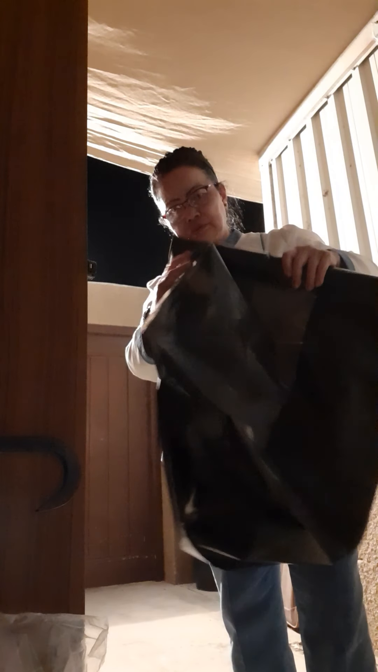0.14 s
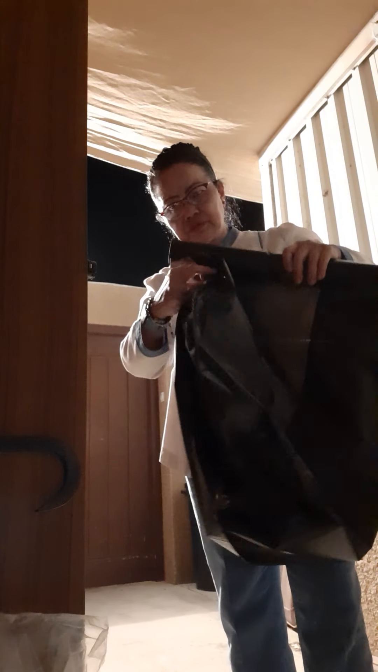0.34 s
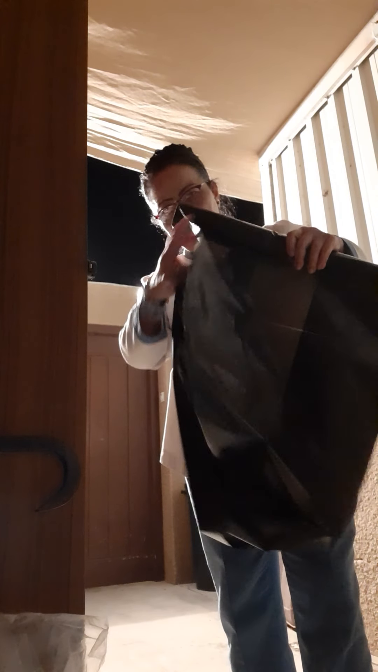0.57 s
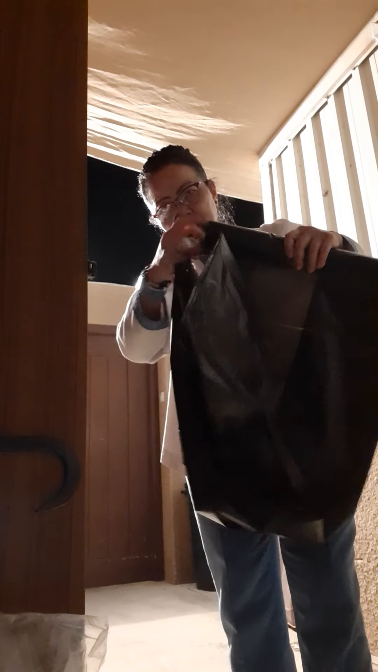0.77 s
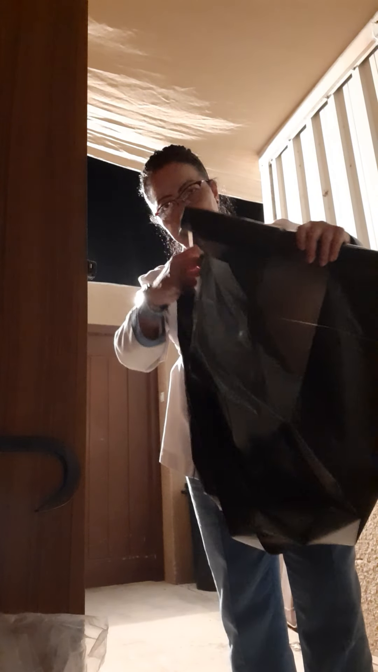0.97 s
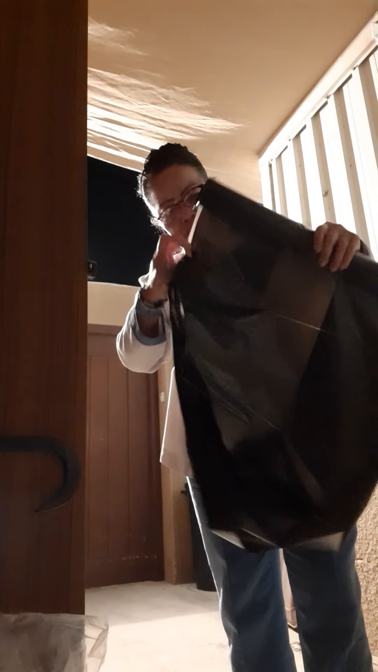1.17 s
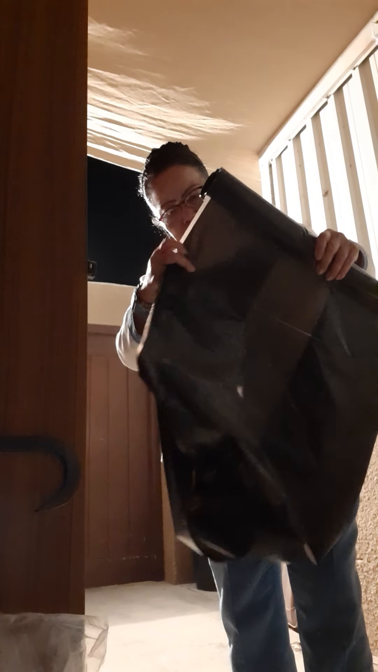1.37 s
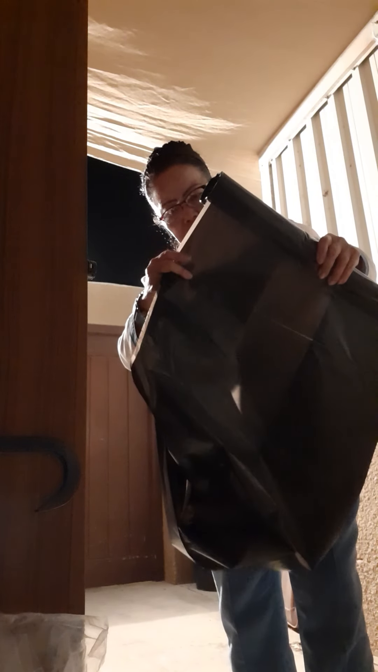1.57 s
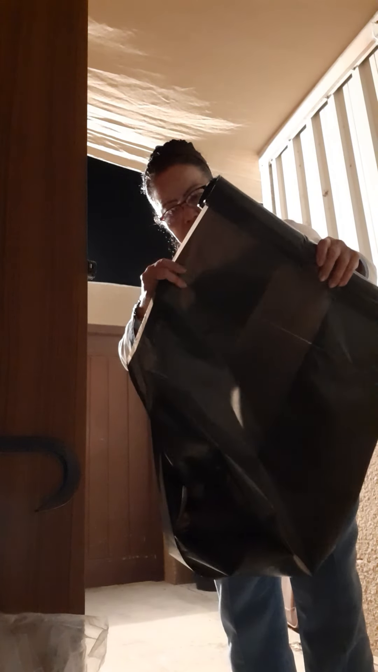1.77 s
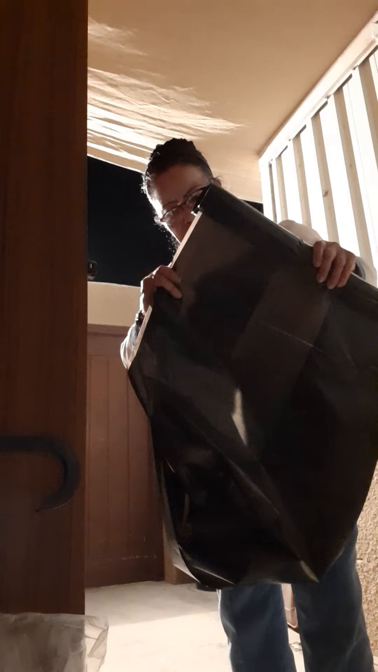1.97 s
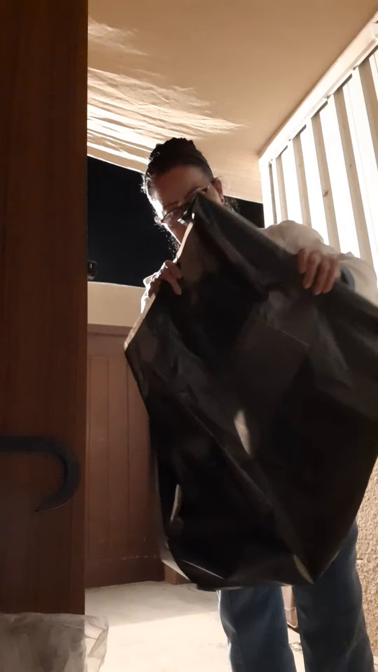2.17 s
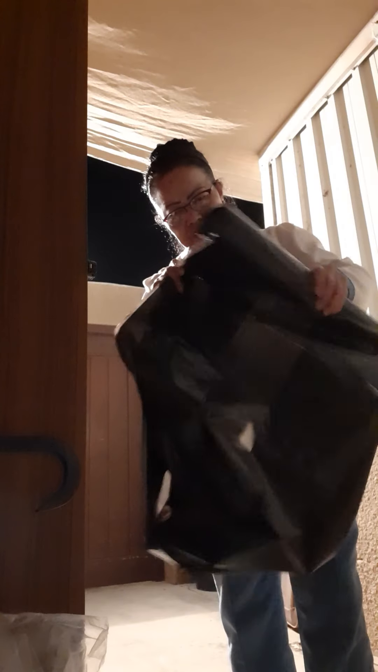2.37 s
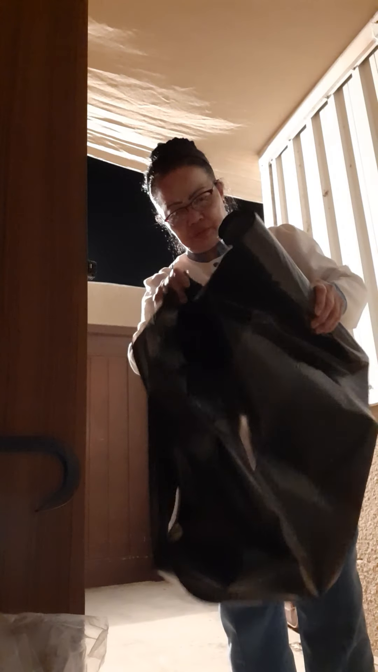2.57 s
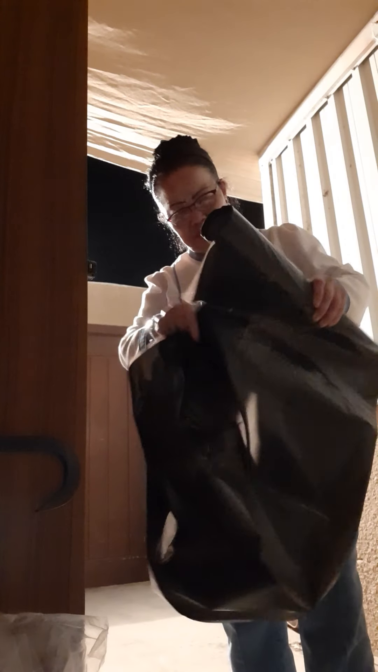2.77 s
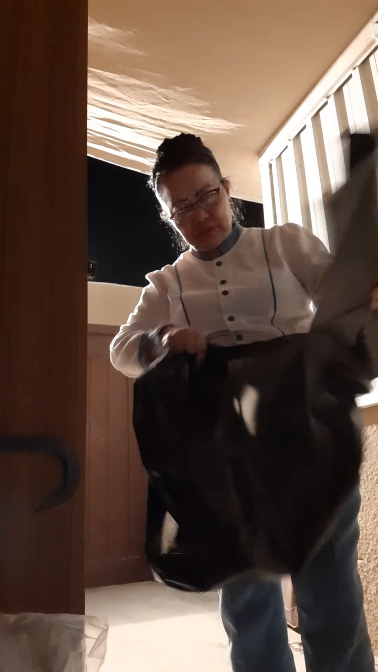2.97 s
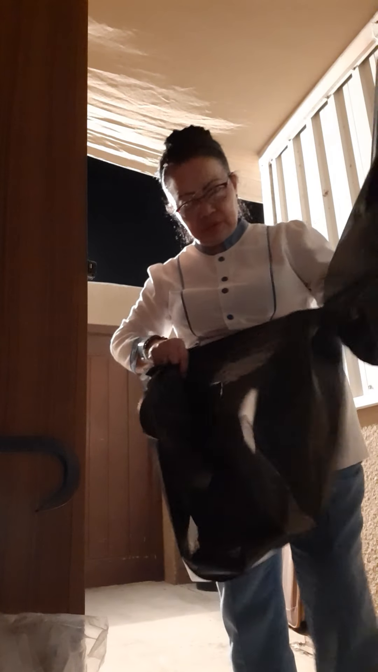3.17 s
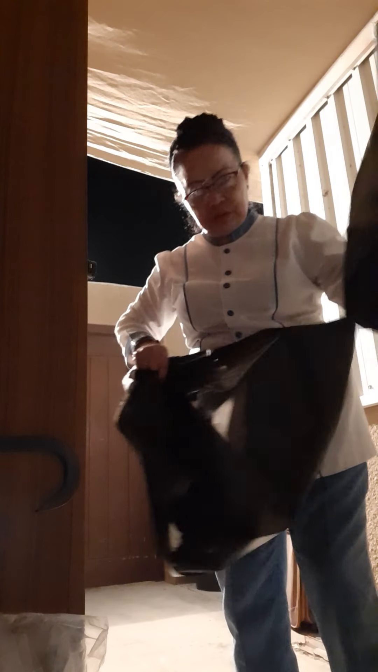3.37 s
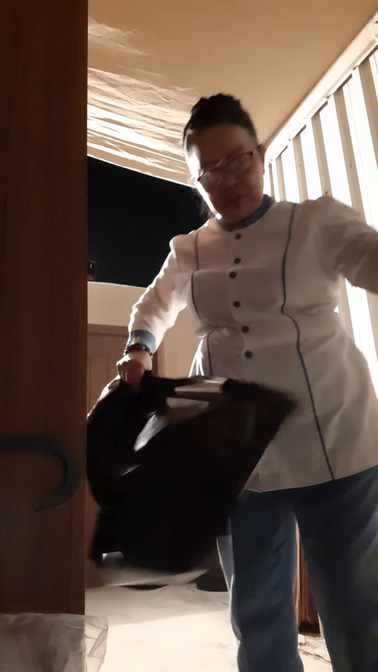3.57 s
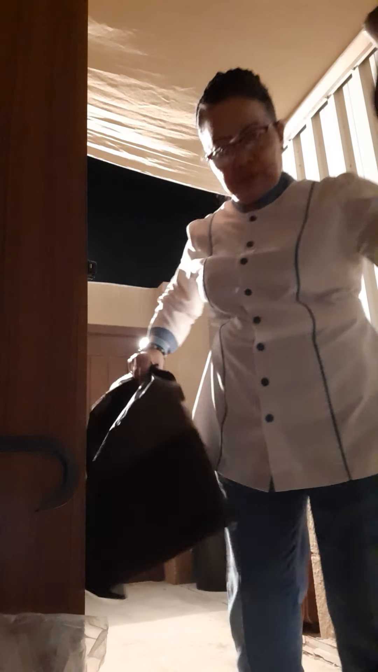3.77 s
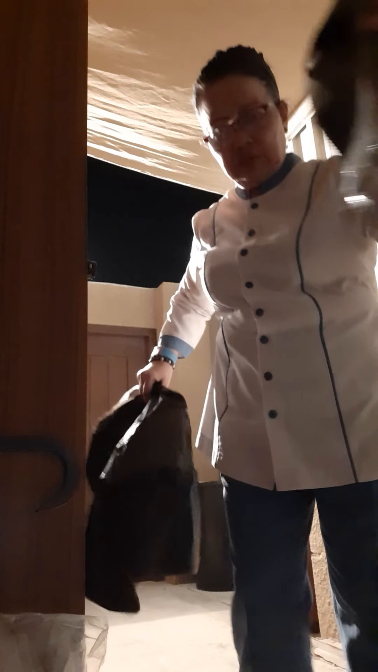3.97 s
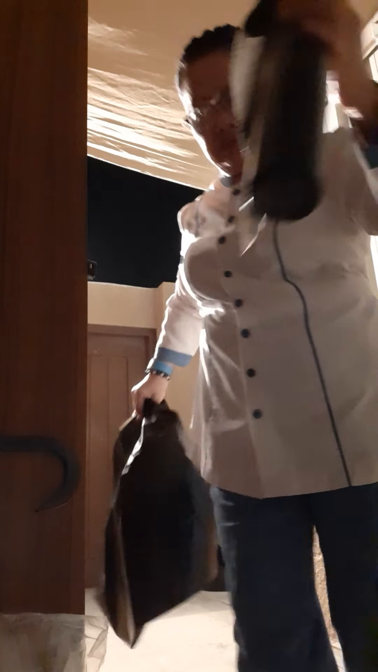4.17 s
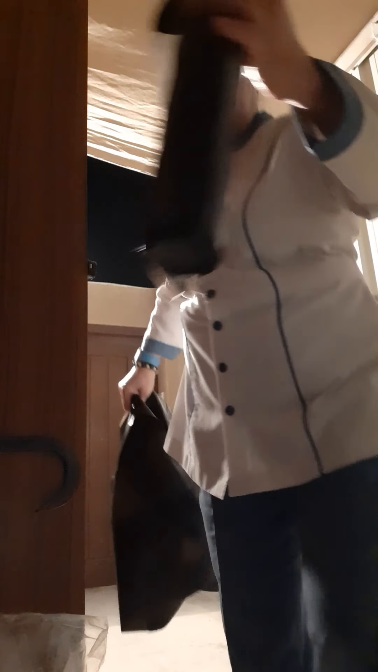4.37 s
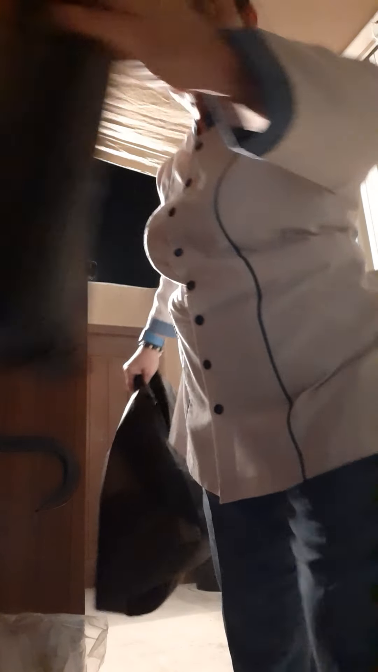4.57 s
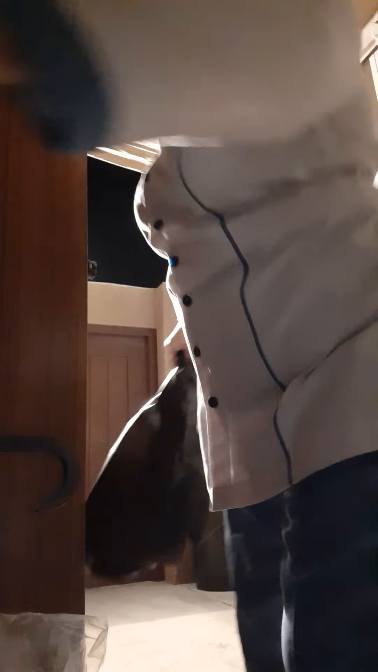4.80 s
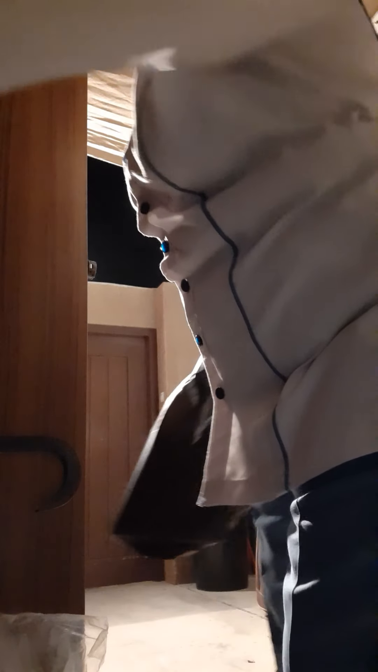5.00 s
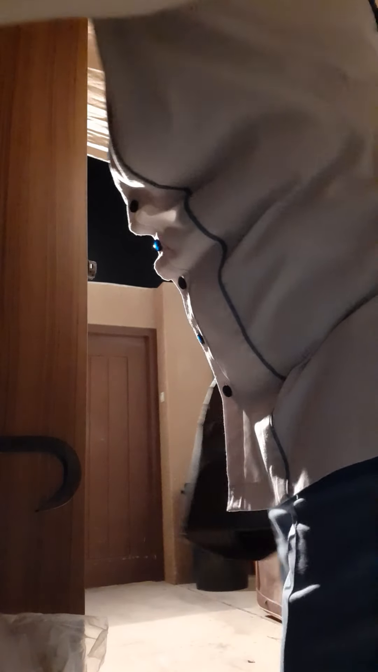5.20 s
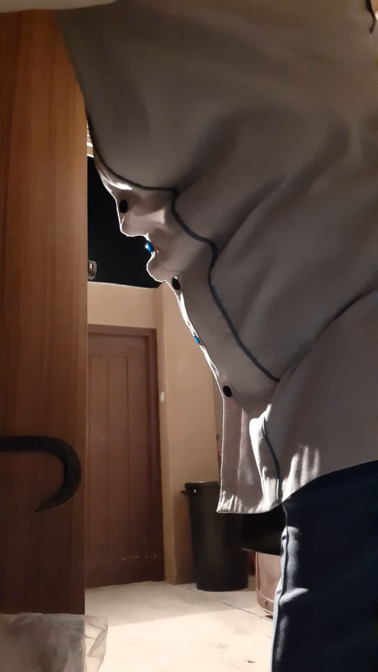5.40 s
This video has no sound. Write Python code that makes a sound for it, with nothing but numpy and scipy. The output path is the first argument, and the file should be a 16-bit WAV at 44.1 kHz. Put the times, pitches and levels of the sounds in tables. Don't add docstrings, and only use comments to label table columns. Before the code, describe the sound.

Quiet plastic rustling gives way to sharp crackling jerks, a long tearing rip, then small rustles and a loud crinkly drag.

```python
import sys
import numpy as np
from scipy import signal
from scipy.fft import rfft, irfft
from scipy.io import wavfile

SR = 44100
rng = np.random.default_rng(int(sys.argv[2]) if len(sys.argv) > 2 else 0)


def nominal_scale(level):
    x = np.asarray(level, float) / 20
    return 10 ** x


def pcm_store(signal):
    levels = np.round(np.clip(np.atleast_2d(signal), -1, 1) * 32767)
    wavfile.write(sys.argv[1], SR, levels.astype(np.int16).T)


N = 239977
SLOW = 40


def rms_one(x):
    return x / np.sqrt(np.mean(x ** 2) + 1e-20)


def in_time(rows):
    s, *columns = np.transpose(rows)
    return [np.interp(np.arange(N) / SR, s, column) for column in columns]


def at_hz(points, hz):
    table_hz, values = np.transpose(points)
    return np.interp(np.log(hz), np.log(table_hz), values)


def band(x, low_hz, high_hz, order=2):
    return signal.sosfilt(signal.butter(order, [low_hz, high_hz], "band", fs=SR, output="sos"), x)


def high_pass(x, hz):
    return signal.lfilter(*signal.butter(1, hz, "high", fs=SR), x)


def peak(x, hz, width_hz, db):
    return x + (nominal_scale(db) - 1) * signal.lfilter(*signal.iirpeak(hz, hz / width_hz, fs=SR), x)


def drift(per_s):
    r = np.exp(-2 * np.pi * SLOW * per_s / SR)
    noise = rng.standard_normal(N // SLOW + 2002)
    slow = signal.lfilter([1], [1, -2 * r, r * r], noise)[2000:]
    return np.interp(np.arange(N) / SLOW, np.arange(len(slow)), rms_one(slow))


def sides(pan_db):
    return nominal_scale(np.array([pan_db / 2, -pan_db / 2]))


# pitch in Hz, level in dB per Hz.
RUMBLE_COLOUR = [(25, 4), (60, 3.5), (100, -2.5), (220, -13), (480, -22), (800, -21.5), (1150, -20),
                 (1700, -31.5), (2500, -36), (6000, -44.5), (16000, -53)]
# time in seconds, level in dB.
RUMBLE_LEVEL = [(0.0, -48), (0.8, -47.5), (2.3, -48.5), (2.8, -45.5), (3.36, -43), (3.68, -50), (4.15, -47),
                (4.76, -49), (5.44, -45.5)]
# pitch in Hz, likeness (1 same, -1 opposite).
RUMBLE_LIKENESS = [(60, 1), (180, 0.9), (550, 0.57), (1650, -0.24), (4970, -1.38), (15000, -1.8)]


def rumble(patchy_db=2.5):
    out = 0
    edges_hz = 28 * 2 ** np.arange(0, 9.4, .5)
    white = rng.standard_normal((2, 2, N + 8000))
    for k, (low, high) in enumerate(zip(edges_hz, edges_hz[1:])):
        mid, side = band(white[k % 2], low, high)[:, 8000:]
        hz = np.sqrt(low * high)
        alike = np.clip(at_hz(RUMBLE_LIKENESS, hz), -1, 1)
        gain = nominal_scale(at_hz(RUMBLE_COLOUR, hz) + patchy_db * drift(5.6))
        out = out + gain * (np.sqrt(1 + alike) * mid + np.sqrt(1 - alike) * side * [[1], [-1]])
    return rms_one(out) * nominal_scale(in_time(RUMBLE_LEVEL)[0] + 3.0)


def porch(x):
    t60_s, first_echo_s = .2, .004
    t = np.arange(int(.3 * SR)) / SR
    noise = rng.standard_normal((2, len(t))) * nominal_scale(-60 * t / t60_s) * (t > first_echo_s)
    mid, side = band(noise, 290, 8000, order=1)
    side = high_pass(side, 450)
    tail = np.array([mid + side, mid - side])
    tail = tail / np.sqrt((tail ** 2).sum(axis=1, keepdims=True))
    return signal.oaconvolve(x, tail, axes=1)[:, :N]


# start in seconds, peak level in dB, pitch in Hz, time to fall 60 dB in seconds, left-right in dB.
KNOCKS = [
    (2.374, -21, 446, 0.11, -2),
    (2.417, -30.5, 322, 0.1, 3),
    (2.812, -27.5, 380, 0.11, 4),
    (2.826, -21, 308, 0.057, -3),
    (2.854, -22.5, 425, 0.17, 2),
    (2.94, -34, 566, 0.29, -12),
    (4.68, -20, 115, 0.015, -3),
    (4.685, -33.5, 350, 0.016, -8),
    (5.393, -35, 116, 0.028, 28),
    (5.398, -29, 527, 0.0052, 22),
]


def knocks():
    out = np.zeros((2, N + 4000))
    t = np.arange(4000) / SR
    for s, peak_db, hz, t60_s, pan_db in KNOCKS:
        swing = np.sin(2 * np.pi * hz * t) * nominal_scale(peak_db - 60 * t / t60_s)
        start = int(s * SR)
        out[:, start:start + 4000] += swing * sides(pan_db)[:, None]
    return out[:, :N]


def snaps(count, t60_s, tail_db, apart_hz):
    t = np.arange(1400) / SR
    decay = nominal_scale(-60 * t / t60_s) + nominal_scale(tail_db - 60 * t / (6 * t60_s))
    mid, side = rng.standard_normal((count, 2, 1400)).transpose(1, 0, 2) * decay
    side = high_pass(side, apart_hz)
    return np.stack([mid + side, mid - side], axis=1)


ZONE_CENTRES_HZ = [330, 1200, 4500, 11500]


def zones(x):
    size = x.shape[-1]
    place = np.interp(np.log(np.fft.rfftfreq(size, 1 / SR) + 1), np.log(ZONE_CENTRES_HZ), np.arange(4))
    spectrum = rfft(x)
    weights = [np.cos(np.pi / 2 * np.clip(place - k, -1, 1)) ** 2 for k in range(4)]
    return [irfft(spectrum * weight, size) for weight in weights]


# start in
# seconds, peak level in dB, body in dB against the peak, sizzle in dB against the peak before a fixed 15 dB
CREASES = [(.1471, -45, -21, -4), (.2892, -43, -19, -21), (.3067, -23, -12, -39),
           (0.4516, -39, -1, -11), (0.4906, -44, -14, -10), (.58, -35.5, -17, -16),
           (.7644, -34, -11, -14), (0.806, -36.5, -2, -20), (0.937, -33, -8, -20),
           (.9557, -37, -3, -18), (0.997, -39, 1, -24), (1.0294, -37, -4, -15),
           (1.1072, -26, -23, -9), (1.13, -24, -29, -24), (1.137, -33.5, -0.5, -15),
           (1.1974, -42.5, -20, -4.5), (1.2397, -33.5, -5, -28), (1.258, -45, -3, -24),
           (1.285, -29.5, -1.5, -19), (1.3803, -39, -2, -9), (1.7, -49, -20, -12),
           (1.7366, -37, -9, -15), (1.7922, -46, -6, 5.5), (2.0168, -43, -5, -6.5),
           (2.061, -34.5, -30, -26), (2.141, -36, -3.5, -20), (2.169, -33, -7.5, -34),
           (2.2106, -33, -16, -15), (2.2235, -31, -23, -12), (2.256, -31.5, -22, -9),
           (2.2741, -22.5, -24, -26), (2.3057, -40, -9, 1.5), (2.328, -45.5, 12, -18),
                (2.3743, -12, -2.5, -8.5), (2.438, -31, 2, -3), (2.4784, -24, -26, -9),
                (2.555, -36, 2, -3.5), (2.579, -32, -32, -20), (2.611, -26, -7, -26), (2.684, -35, -4, -20),
                (2.7182, -25.5, -9, -33), (2.756, -42, -21, 4), (2.8018, -16.5, 0, -8.5),
                (2.8135, -18.5, 2.5, -14), (2.9051, -21.5, 6, -18), (2.9134, -13.5, 4, -20),
                (2.9207, -9, -7, -18), (3.0379, -15.5, -6, -14), (3.0737, -16, -3.5, -42),
           (3.478, -33, -19, -26), (3.498, -39, -23, -24), (3.5498, -45, -18, -5),
                 (3.5873, -36, -26, -33), (3.6164, -36, -19, -22), (3.639, -27, -11.5, -15),
                 (3.66, -28, -26, -15), (3.6763, -22, -2, -17), (3.7219, -25, -6.5, -22),
                 (3.977, -39.5, -15, -12), (4, -37, -7, -26), (4.054, -48, -8, -11), (4.127, -30, -6, -4),
                 (4.303, -42, -25, -17), (4.244, -58.5, 11, -14), (4.353, -50, -16, -7),
                 (4.376, -38.5, -10, -11), (4.4135, -51, 15, -16), (4.5683, -44, -24, -21),
                 (4.6034, -41, -16, -7), (4.6965, -39.5, -23, -7), (4.7204, -41, -28, -10),
                 (4.771, -35.5, -23, -29), (4.8681, -45, -25, 3), (4.9018, -37.5, -20, -14),
                 (5.151, -17, -22, -31), (5.2273, -19, -19, -14), (5.064, -26, -15, -13),
                 (5.3339, -23, -18, -15)]


def creases():
    s, peak_db, body_db, sizzle_db = np.transpose(CREASES)
    pan_db = 4 * rng.standard_normal(len(s))
    shapes = snaps(count=len(s), t60_s=.004, tail_db=-7, apart_hz=3000)
    lead = 100
    size = 1400 + lead
    _, body, middle, sizzle = zones(np.pad(shapes, ((0, 0), (0, 0), (lead, 0))))
    facet_hz = 4600 * 2 ** (.22 * rng.standard_normal((len(s), 1, 1)))
    octaves = np.log2((np.fft.rfftfreq(size, 1 / SR) + 1) / facet_hz)
    middle = irfft(rfft(middle) * (0.69 + np.exp(-(octaves / 0.61) ** 2)), size)
    cracks = 0
    for zone, db in [(body, body_db), (middle, -1.5), (sizzle, sizzle_db + 15.0)]:
        level = nominal_scale(peak_db + db)[:, None, None]
        cracks = cracks + zone / np.abs(zone).max(axis=(1, 2), keepdims=True) * level
    out = np.zeros((2, N + size))
    for start, crack, pan in zip((s * SR).astype(int), cracks, pan_db):
        out[:, start:start + size] += crack * sides(pan)[:, None]
    return out[:, lead:N + lead]


def tearing():
    from_s, to_s, bridges_per_s, depth_db = 3.05, 3.1, 100, 4.5
    t = np.arange(N) / SR
    turns = bridges_per_s * t + 0.35 * drift(50)
    uneven = np.clip(1 + 0.33 * drift(36), 0, 2)
    return depth_db * (.5 - turns % 1) * (t > from_s) * (t < to_s) * uneven


# start in seconds, end in seconds, extra path in seconds, strength from 0 to 1.
MIRROR = [
    (4.04, 4.2, .00037, .3),
    (4.95, 5.44, .00023, .2),
]


def mirrored(x):
    out = x.copy()
    echo = (x + np.roll(x, 1, axis=1)) / 2
    for start_s, stop_s, lag_s, strength in MIRROR:
        a, b, lag = int(start_s * SR), min(int(stop_s * SR), N), int(lag_s * SR)
        both = x[:, a:b] + strength * echo[:, a - lag:b - lag]
        out[:, a:b] = both / np.hypot(1, strength)
    return out


def movement(rows):
    t = np.arange(0, N + SLOW, SLOW)[:, None] / SR
    at, rise, hold, fall, level_db = np.transpose(rows)
    away = np.maximum(np.maximum((at - t) / rise, (t - at - hold) / fall), 0)
    swing_db = 20
    return (nominal_scale(level_db - swing_db * away * (1 + away) / 2) ** 2).sum(axis=1) + 1e-30


# full strength at seconds, rise in seconds, hold in seconds, fall in seconds, crackle level in dB.
FIDGETS = [(.03, 0.13, 0.084, 0.14, -61.5), (.24, 0.32, 0.022, 0.11, -57.5),
           (.32, 0.066, 0.03, 0.051, -45.5), (.47, 0.11, 0.12, 0.03, -56.5), (.77, 0.28, 0.014, 0.081, -54),
           (.94, 0.15, 0.11, .12, -54.5), (1.115, 0.022, 0.03, 0.02, -53), (1.23, 0.086, 0.015, 0.14, -53),
           (1.38, .12, 0, 0.087, -51.5), (1.47, 0.14, 0.065, 0.12, -62.5), (1.71, 0.13, 0.1, 0.11, -60),
           (2.765, .03, 0.029, .03, -43.5), (3.79, .04, 0.03, 0.092, -61), (3.87, 0.11, .07, 0.11, -65),
           (4.2, .1, .07, 0.11, -67.5), (4.47, .1, 0.08, 0.065, -70), (3.99, .04, 0.02, 0.065, -54.5),
           (4.32, 0.12, 0.08, 0.11, -61.5), (4.615, 0.046, .03, .07, -54.5),
           (4.7, 0.015, 0.023, .04, -59.5), (4.78, 0.054, .04, 0.086, -55), (4.87, 0.055, 0.087, 0.11, -55)]
GROPES = [
    (2.018, 0.08, .06, 0.18, -57.5),
    (2.17, .12, 0.08, .1, -53),
    (2.332, .05, 0.032, 0.055, -41),
    (2.5, .05, 0.08, 0.069, -49),
    (2.65, 0.052, 0.031, .04, -56),
    (2.715, 0.05, 0.014, 0.05, -47),
    (3.49, .05, .01, 0.12, -57.5),
    (3.63, .07, 0.045, 0.061, -52),
    (3.689, .04, 0.044, 0.065, -43.5),
]
JERKS = [
    (2.379, .02, 0.002, 0.1, -27),
    (2.821, 0.029, 0.032, 0.14, -31),
]
STRAINS = [(2.88, 0.073, 0.045, .2, -27)]
RIPS = [
    (3.041, 0.036, 0.01, 0.19, -31.5),
    (3.141, 0.076, .3, 0.026, -34.5),
]
SLIDES = [
    (3.724, 0.0089, 0.0087, .065, -36),
    (4.055, .005, 0.035, .06, -38.5),
]
DRAGS = [
    (5.119, 0.1, 0.076, .2, -35),
    (5.3, .15, 0.022, 0.06, -42),
]
# sheet boom, body and sizzle in dB against the crackle,
# left-right in dB, share of smooth sliding from 0 to 1.
FIDGET_TONE = (-8.5, -4, -6, -0.5, 0.6)
GROPE_TONE = (-13.5, -5, -11, -0.5, 0.4)
JERK_TONE = (-2, -2, -5.5, -0.2, .3)
STRAIN_TONE = (-8, -3, -8, 1, .3)
RIP_TONE = (-10.5, -4.5, -3.5, -1.5, .5)
SLIDE_TONE = (-7.5, -5, -3, -1.7, 0.4)
DRAG_TONE = (-16, -12.5, -8, -1.2, 0.74)
# boom, body, crackle and sizzle, all in dB.
AT_REST_DB = (-59.5, -79, -77, -93)


def hands():
    kinds = [FIDGETS, GROPES, JERKS, STRAINS, RIPS, SLIDES, DRAGS]
    tones = [FIDGET_TONE, GROPE_TONE, JERK_TONE, STRAIN_TONE, RIP_TONE, SLIDE_TONE, DRAG_TONE]
    power = np.array([movement(rows) for rows in kinds])
    boom, body, sizzle, pan, slide = np.transpose(tones)
    zone_db = np.array([boom, body, 0 * boom, sizzle])
    at_rest = nominal_scale(AT_REST_DB)[:, None]
    gains = np.sqrt(nominal_scale(zone_db) ** 2 @ power + at_rest ** 2)
    share = power / power.sum(axis=0)
    s = np.arange(power.shape[1]) * SLOW / SR
    *gains, pan_db, sliding = in_time(np.transpose([s, *gains, pan @ share, slide @ share]))
    sway_db, sway_per_s = 4, 8.1
    return gains, pan_db + sway_db * drift(sway_per_s), sliding


def crackle(per_s=3000, spread_db=3.0, clump_db=2.5):
    gains, pan_db, slide = hands()
    busy_db, calm_share = -43.5, .3
    busy = np.clip(np.sqrt(gains[2] / nominal_scale(busy_db)), calm_share, 1)
    born = rng.random(N) < busy * per_s * nominal_scale(clump_db * drift(60)) / SR
    strength = nominal_scale(spread_db * np.minimum(rng.exponential(1, N), 5))
    buckles = rms_one(born * strength * rng.choice([-1, 1], N) / np.sqrt(busy))
    hiss = rng.standard_normal(N)
    source = np.sqrt(1 - slide) * buckles + np.sqrt(slide) * hiss
    source = source * nominal_scale(tearing())

    patches = 18
    patch = rng.integers(0, patches, N)
    shapes = snaps(count=patches, t60_s=0.0042, tail_db=-41.5, apart_hz=2740)[..., :400]
    film = 0
    for k in range(patches):
        film = film + signal.oaconvolve((source * (patch == k))[None], shapes[k], axes=1)[:, :N]
    film = band(film, 242, 16000, order=3)
    film = peak(film, hz=365, width_hz=23, db=6)

    out = 0
    for zone, gain, trim_db in zip(zones(film), gains, [-3.5, -1.47, -2.0, 1.5]):
        flutter_db = 3.4 * (1 - slide) * drift(37)
        out = out + rms_one(zone) * gain * nominal_scale(trim_db + flutter_db)
    return mirrored(out) * sides(pan_db)


def scene():
    near = crackle() + creases() + knocks()
    return near + nominal_scale(-15) * porch(near) + rumble()


def band_limit(x):
    return signal.sosfilt(signal.butter(12, 17000, fs=SR, output="sos"), x)


# pitch in Hz, width in Hz, lift in dB.
MIC_PEAKS = [(1292, 445, -5.5), (1500, 120, 7), (1884, 108, -7), (2043, 88, 3), (7910, 690, 4.5),
             (8850, 4600, -8.5), (11640, 2250, 3)]


def record(dry):
    x = dry
    for hz, width_hz, db in MIC_PEAKS:
        x = peak(x, hz, width_hz, db)
    x = signal.sosfilt(signal.butter(8, 42, "high", fs=SR, output="sos"), x)
    x = signal.sosfilt(signal.cheby2(18, 55, 15950, fs=SR, output="sos"), x)
    return band_limit(x)


dry = scene()
out = record(dry)
pcm_store(out)
```